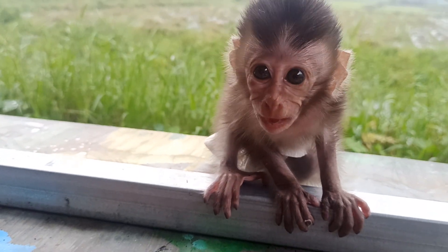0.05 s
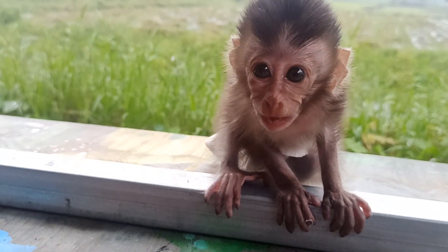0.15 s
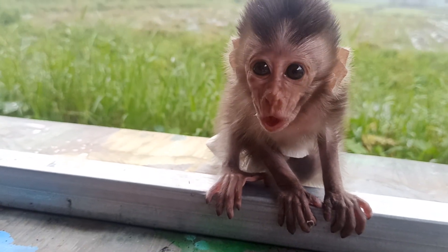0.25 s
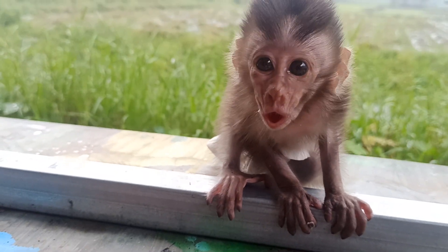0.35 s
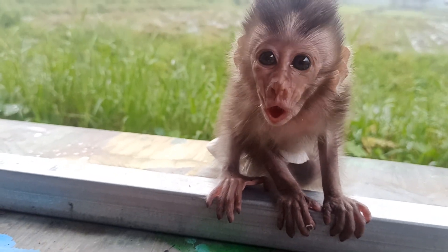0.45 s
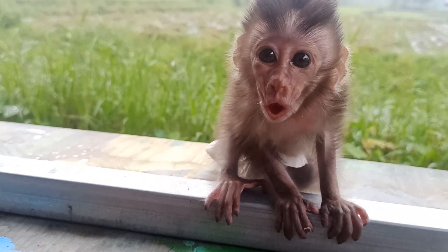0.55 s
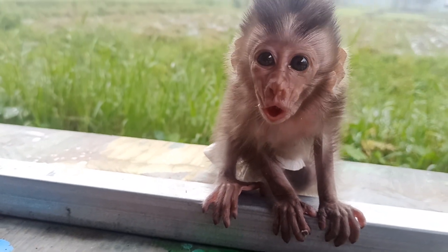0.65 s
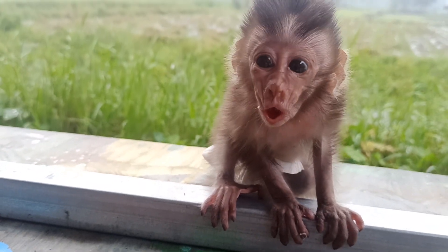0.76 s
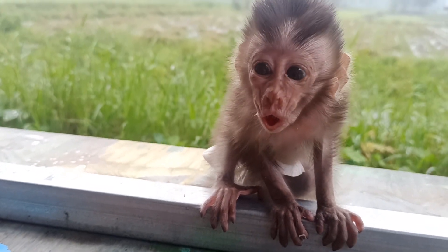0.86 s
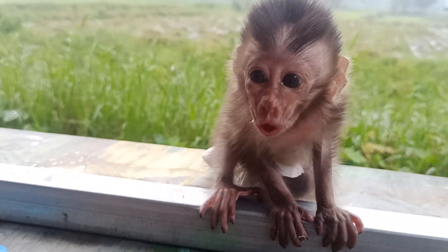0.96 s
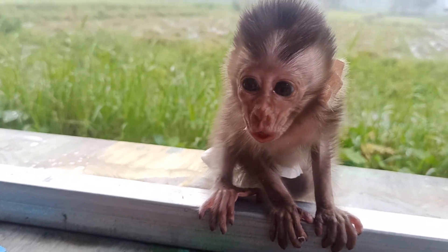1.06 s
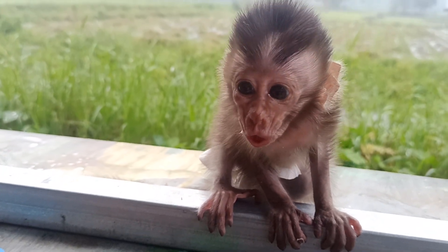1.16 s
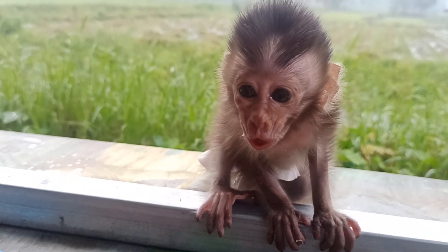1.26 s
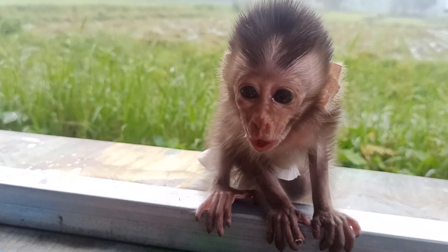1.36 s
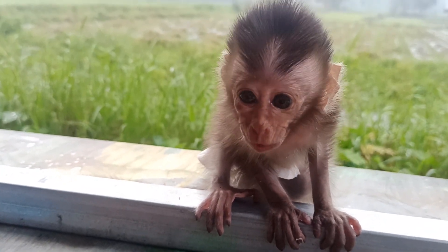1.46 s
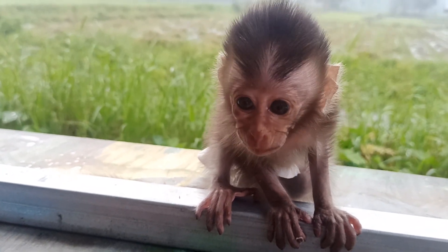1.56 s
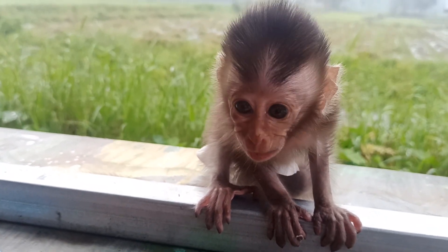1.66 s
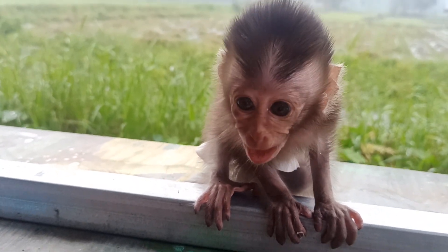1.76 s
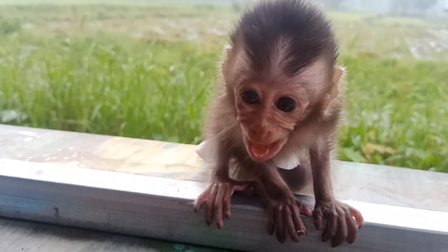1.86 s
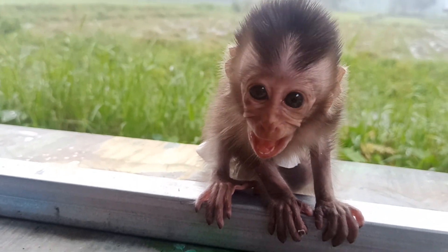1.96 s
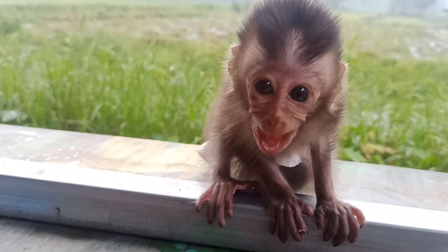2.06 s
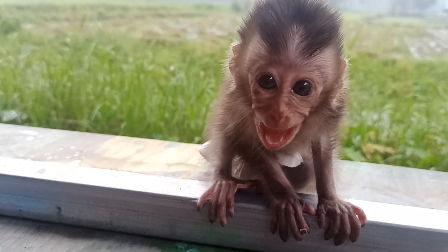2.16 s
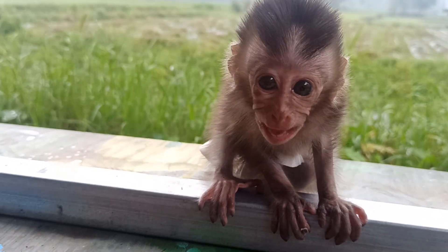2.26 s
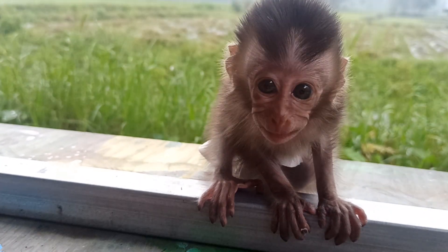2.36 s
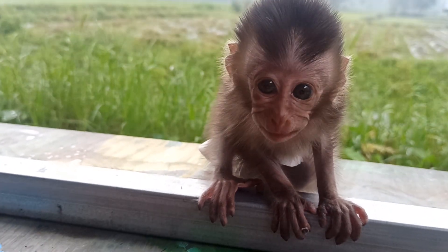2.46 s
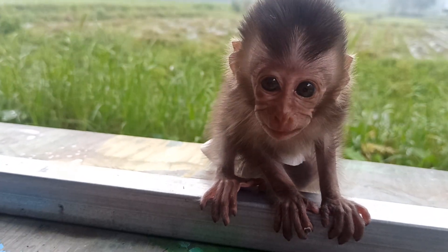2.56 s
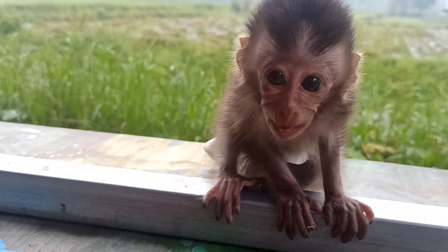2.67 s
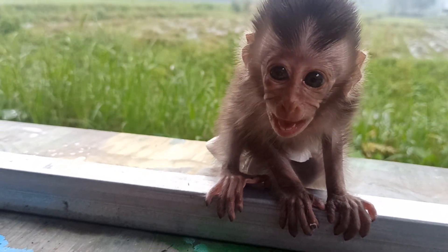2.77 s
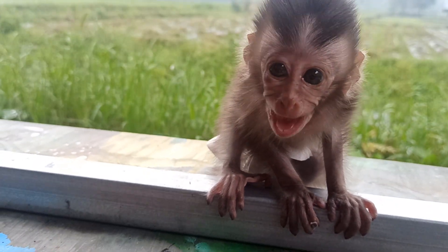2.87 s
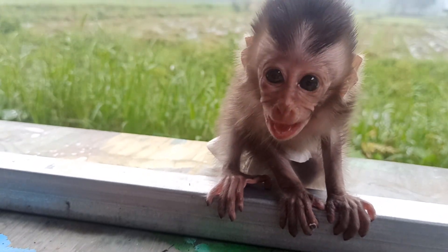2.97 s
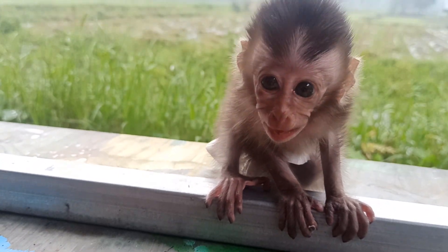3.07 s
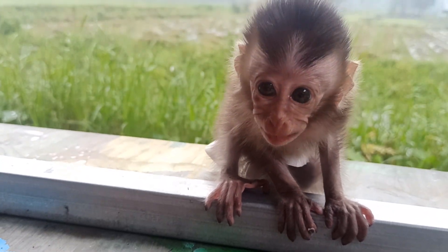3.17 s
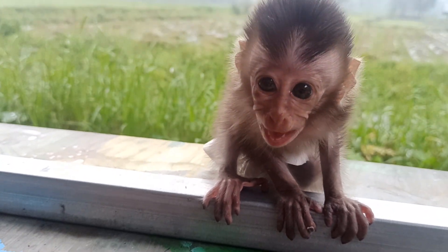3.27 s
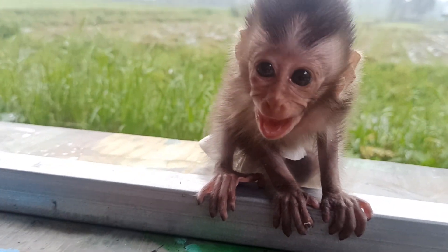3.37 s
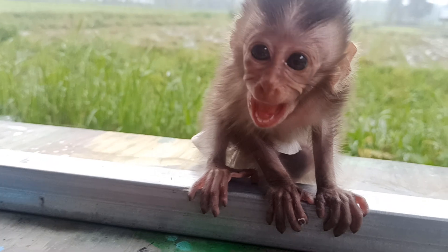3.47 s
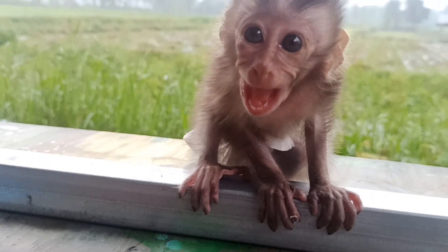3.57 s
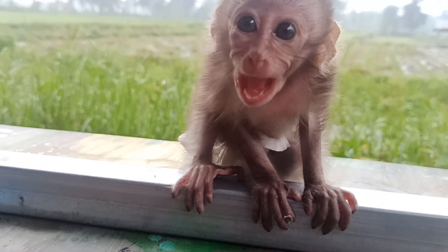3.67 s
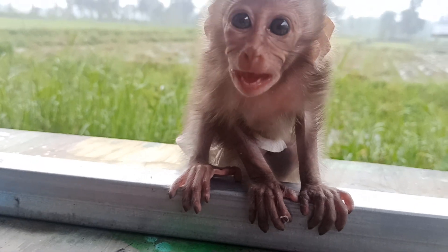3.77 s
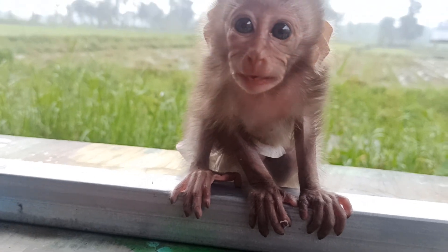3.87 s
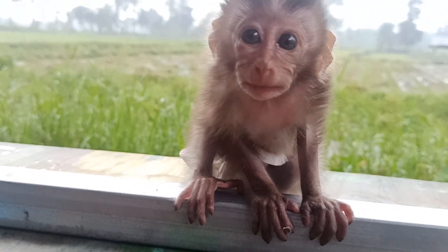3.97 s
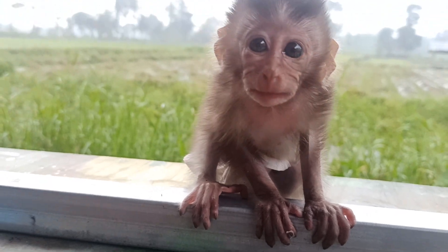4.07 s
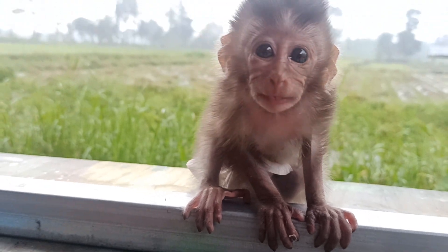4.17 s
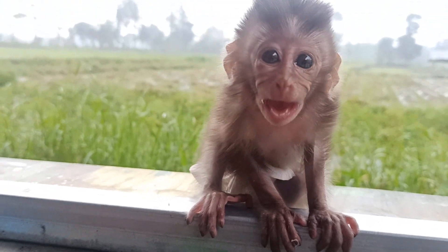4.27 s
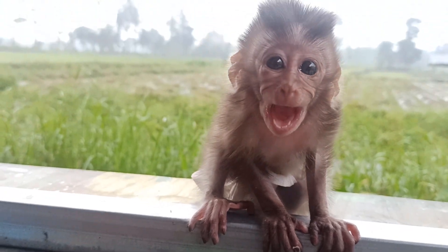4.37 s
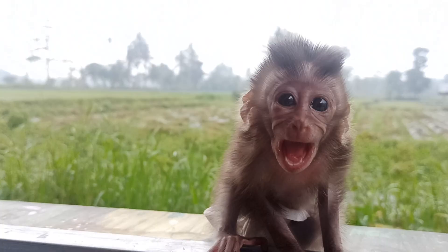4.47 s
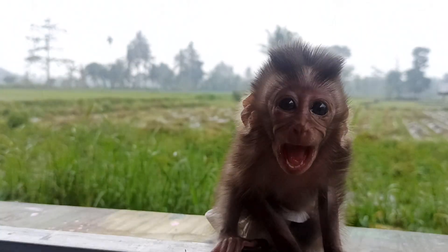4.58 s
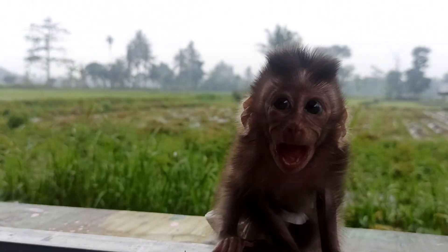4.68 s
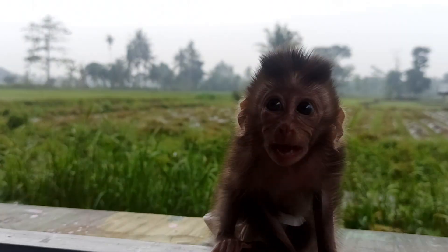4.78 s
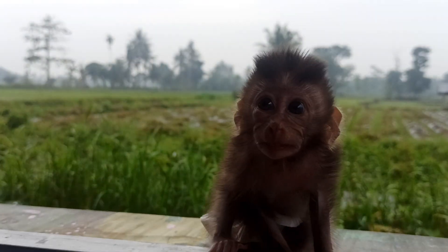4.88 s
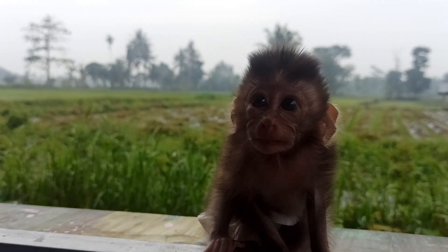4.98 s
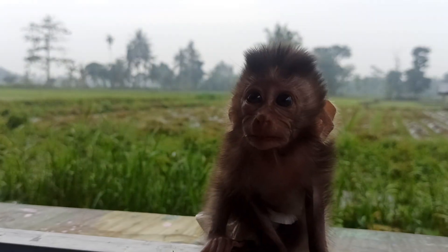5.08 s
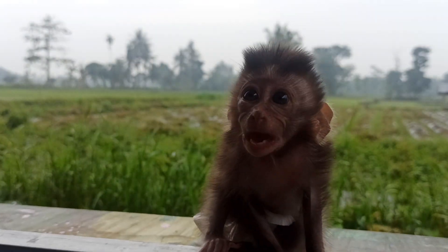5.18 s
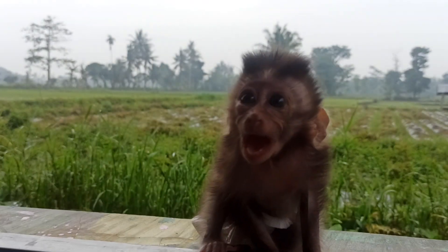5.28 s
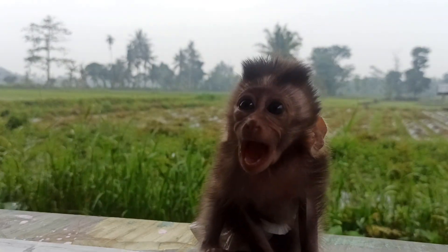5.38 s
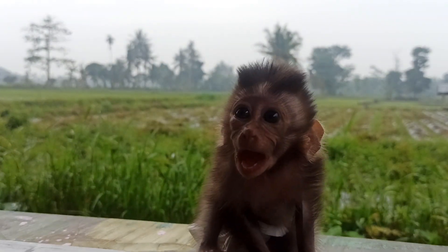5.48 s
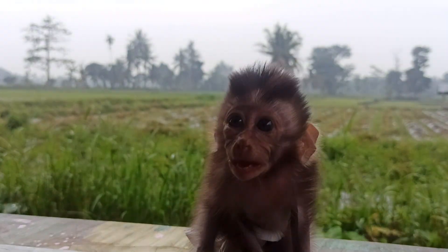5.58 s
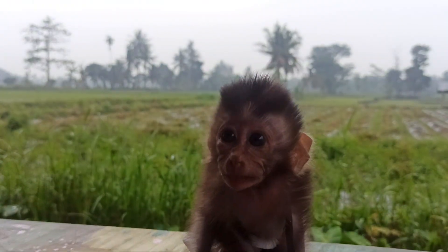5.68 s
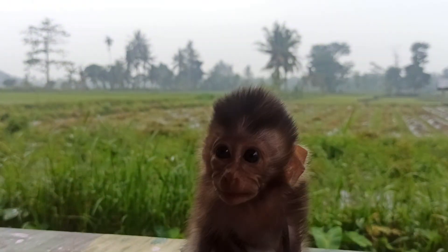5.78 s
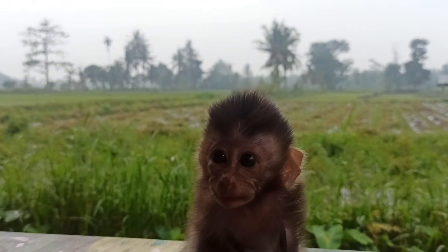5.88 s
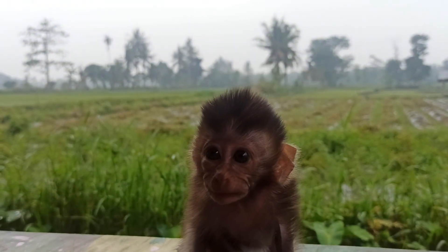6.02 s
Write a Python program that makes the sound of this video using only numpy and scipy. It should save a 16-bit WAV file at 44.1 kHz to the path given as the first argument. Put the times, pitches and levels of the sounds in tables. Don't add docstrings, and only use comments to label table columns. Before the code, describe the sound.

A young monkey very close to a phone microphone gives two soft arched coos and a wavering whimper, then a piercing scream leaping upward and plunging into a torn rasp. A high chirp and three rising squeals follow, with quiet gaps between. Behind lie a faint insect drone, a tiny cricket chirping in threes, low far rumble and dull finger knocks on the case.

```python
import sys
import numpy as np
from scipy import signal
from scipy.fft import rfft, irfft, next_fast_len
from scipy.io import wavfile
from scipy.ndimage import uniform_filter1d, minimum_filter1d, map_coordinates

SR = 44100
rng = np.random.default_rng(int(sys.argv[2]) if len(sys.argv) > 2 else 0)


def to_wav(sig):
    pcm = np.clip(np.atleast_2d(sig), -1, 1) * 32767
    pcm = np.round(pcm).astype(np.int16)
    wavfile.write(sys.argv[1], SR, pcm.T)


def makeup_ratio(level_db):
    decades = np.asarray(level_db, float) / 20
    return 10 ** decades


N = 266805


def unit(x):
    return x / np.sqrt(np.mean(x ** 2) + 1e-20)


def along(points, hz):
    f, v = np.transpose(points)
    return np.interp(np.log(hz + 1), np.log(f + 1), v)


def wobble(rate_hz, size=N):
    knots = rng.standard_normal(int(size * rate_hz / SR) + 4)
    return map_coordinates(knots, [np.arange(size) * rate_hz / SR])


def filtered(x, response):
    m = next_fast_len(N + 8192)
    return irfft(rfft(x, m) * response(np.fft.rfftfreq(m, 1 / SR)), m)[..., :N]


def shares(balance, hz):
    turn = np.arctan(makeup_ratio(-along(balance, hz)))
    return np.sqrt(2) * np.array([np.cos(turn), np.sin(turn)])


# start in
# seconds, length in seconds, level in dB.
PUFFS = [(0, 0.019, -32), (1.387, 0.004, -42.5), (2.897, 0.022, -42), (3.659, 0.015, -42.5),
         (3.6758, 0.002, -27), (3.678, 0.011, -30), (4.667, 0.002, -29), (4.675, 0.013, -32.5),
         (5.42, 0.013, -28), (5.688, 0.0072, -45.5), (2.103, 0.026, -21), (2.11, 0.0017, -20.5),
         (2.1186, 0.001, -13), (2.1436, 0.001, -15), (2.146, 0.014, -27.5), (2.159, 0.07, -36),
         (3.471, 0.029, -36.5), (4.471, 0.02, -39.5), (1.894, 0.052, -42)]


def puffs():
    t, flow = np.arange(N) / SR, np.zeros(N)
    for start_s, length_s, db in PUFFS:
        attack = np.clip((t - start_s) / .002, 0, 1)
        release_s = .004 + 25 * length_s ** 2
        flow += makeup_ratio(db) * attack * np.clip((start_s + length_s - t) / release_s + 1, 0, 1)
    return flow


# frequency in Hz, gain in dB.
OPEN_MOUTH = [(1000, -19), (1500, 17.5), (2000, 21.5), (2600, 24), (3200, 25), (3800, 20.5), (4600, 6),
              (5300, -7), (6200, 0.5), (7200, -2.5), (7900, -11), (8700, -3.5), (10300, -26), (11700, -3),
              (13500, -8), (15500, -15.5)]
# pitch in Hz, tilt in dB per octave.
PURER = [(1000, -0.5), (2000, 14), (2600, 15), (3100, 9.5), (3700, -5), (5000, -16.5), (6500, -4.5)]
# frequency in Hz, gain in dB.
THIN = [(7600, -0.5), (8200, -16.5), (9300, -28), (10400, -22.5), (11200, -47)]


def cry(call, lips, parted, turns, lag):
    tilt, breath_db, rows = call
    k = np.arange(1, 13)[:, None]
    s, hz, db = np.transpose(rows)
    at = np.arange(round(s[0] * SR), round(s[-1] * SR))
    curves = [np.interp(at / SR, s, c) for c in (hz, makeup_ratio(db), db.mean() - db)]
    hz, gain, under_db = [uniform_filter1d(c, size=60) for c in curves]

    tilt = tilt + along(PURER, hz) - .078 * np.clip(under_db, 0, 30)
    breath_db = breath_db + .5 * under_db
    strain = np.clip(hz / 5000, .1, 1)
    gape = np.clip((hz - 1050) / 500, 0, 1)
    hoarse = np.clip(makeup_ratio(breath_db) - .2, 0, 1)

    octaves_per_s = np.abs(np.gradient(uniform_filter1d(np.log2(hz), size=400))) * SR
    glide = np.minimum(octaves_per_s, 25) * parted * np.clip(3 - hz / 1000, 0, 1)
    steady_hz = uniform_filter1d(hz, size=80) * (1 + .003 * wobble(150, len(at)))
    shake = .0004 * glide * wobble(500, len(at)) + .07 * hoarse * wobble(700, len(at))
    hz = steady_hz + shake * np.minimum(steady_hz * 0 + uniform_filter1d(hz, size=1), 2500)

    overtone_hz = k * hz
    mouth_db = (1 - gape) * along(lips, overtone_hz) + gape * along(OPEN_MOUTH, overtone_hz)
    thin_db = (k > 2) * along(THIN, overtone_hz)
    notch_db = (k > 1) * -8 * np.exp(-((overtone_hz - 5600) / 330) ** 2)
    wander_db = 3.5 if parted else 1.5
    uneven_db = wander_db * np.array([wobble(55.6, len(at)) for _ in k])
    weight = makeup_ratio(mouth_db + thin_db + notch_db + uneven_db + tilt * np.log2(k))
    weight = weight * np.clip((15650 - overtone_hz) / 400, 0, 1)

    turns[at] = turns[at[0] - 1] + np.cumsum(hz) / SR
    stack = np.sum(weight * np.sin(2 * np.pi * k * turns[at] + lag), axis=0)
    stack = stack / np.sqrt(np.sum(weight ** 2, axis=0) / 2)
    gain = gain * np.clip(np.minimum(at - at[0], at[-1] - at) / (.002 * SR), 0, 1)
    flutter = np.clip(.13 * strain ** 1.5 + hoarse, 0, 1) * wobble(190, len(at))
    grit = .002 * glide * wobble(2500, len(at))
    torn = np.clip(5 * hoarse, 0, 1)
    leak = gain * makeup_ratio(breath_db)
    return at, gain * (1 + flutter + grit) * stack, leak * (1 - torn), leak * torn


# time in seconds, pitch in Hz, level in dB.
COOS = [
    (-7, -25.5, [(0.255, 860, -32), (0.3, 923, -24.5), (0.335, 1004, -20), (0.385, 1013, -15.5), (0.45, 1027, -13.5), (0.49, 1022, -15), (0.515, 973, -19), (0.53, 952, -29), (0.545, 870, -37)]),
    (-8, -27, [(0.708, 722, -37), (0.73, 778, -27.5), (0.745, 879, -24.5), (0.76, 902, -22), (0.79, 899, -20), (0.808, 942, -21), (0.865, 936, -20), (0.882, 947, -27.5), (0.896, 830, -34.5)]),
]
WHIMPERS = [
    (-9, -17.5, [(1.15, 649.6, -33.5), (1.175, 613.5, -33.5), (1.205, 645, -34.5), (1.22, 797, -31.5), (1.25, 804, -32), (1.285, 750, -34.5), (1.296, 848, -26.5)]),
    (-7.5, -19, [(1.294, 825, -35.5), (1.308, 928, -24), (1.318, 969, -27.5), (1.332, 979, -20.5), (1.342, 1064, -26.5), (1.348, 1144, -29), (1.358, 1232, -21), (1.368, 1306, -26), (1.38, 1310, -49.5)]),
    (-12.5, -15.5, [(1.652, 860, -40.5), (1.655, 783, -33), (1.661, 987, -32), (1.671, 977, -28.5), (1.682, 905, -32.5), (1.69, 1022, -36.5), (1.697, 1060, -50.5)]),
]
OOHS = [
    (0, -12.5, [(2.626, 600, -25.5), (2.632, 605, -34), (2.639, 671, -38), (2.646, 741, -37.5)]),
    (0, -14, [(5.134, 616, -33.5), (5.141, 635, -28), (5.15, 676, -30.5), (5.158, 633, -31.5), (5.166, 725, -35), (5.176, 752, -42.5)]),
]
MURMURS = [
    (-11, -11.5, [(2.603, 668, -35.5), (2.612, 660, -35), (2.628, 610, -36)]),
    (-9, -14, [(5.108, 660, -32.5), (5.118, 665, -38), (5.13, 690, -36.5), (5.137, 647, -37.5)]),
    (-2.5, -16.5, [(2.703, 589.3, -38.5), (2.72, 633, -29), (2.735, 951, -26.5), (2.75, 1375, -20), (2.762, 1166, -27.5), (2.78, 1547, -30)]),
    (-6, -7.5, [(3.216, 794, -52.5), (3.23, 898, -31), (3.246, 900, -39.5)]),
    (-4, -16, [(4.178, 898, -34.5), (4.187, 746, -45), (4.195, 800, -49), (4.203, 669, -33), (4.212, 720, -36), (4.22, 829, -41.5), (4.229, 760, -40.5), (4.24, 870, -36), (4.25, 760, -36)]),
    (1, -20, [(5.174, 776, -30), (5.182, 696, -38), (5.192, 627, -29), (5.202, 686, -27)]),
]
CLIMBS = [
    (-3.5, -29.5, [(2.808, 2306, -40), (2.815, 2500, -11.5), (2.835, 2690, -6.5), (2.85, 2906, -37), (2.866, 3040, -30)]),
    (-1.5, -25, [(3.246, 1038, -36), (3.272, 1466, -23), (3.285, 1930, -14.5), (3.3, 2342, -17), (3.312, 2444, -15.5), (3.326, 2652, -9), (3.335, 2863, -11.5)]),
    (-3.5, -30.5, [(3.333, 2830, -19.5), (3.338, 3110, -7.5), (3.342, 3170, 2), (3.35, 3204, -7.5), (3.362, 3390, -31.5), (3.372, 3540, -48)]),
    (0.5, -18.5, [(4.248, 804, -32), (4.258, 939, -22.5), (4.27, 1140, -21), (4.278, 1418, -12.5), (4.282, 1592, -18), (4.291, 1908, -4.5), (4.308, 2190, -12), (4.32, 2425, -15), (4.326, 2640, -20.5)]),
    (2.5, -29, [(4.324, 2627, -5), (4.33, 2808, -18.5), (4.334, 3050, -3.5), (4.342, 3258, 1.5), (4.349, 3277, -2), (4.353, 3360, -25), (4.358, 3430, -13), (4.364, 3620, -28.5)]),
    (1, -20.5, [(5.201, 704, -26), (5.214, 1230, -25.5), (5.226, 1598, -9), (5.237, 1556, -14), (5.245, 1200, -17.5), (5.258, 1834, -12), (5.261, 1960, -8.5), (5.264, 2268, -10.5)]),
    (0.5, -25.5, [(5.263, 2370, -20), (5.27, 2570, -11.5), (5.28, 2683, -10), (5.288, 2800, -8.5), (5.3, 3050, -23)]),
    (-22, -26.5, [(5.298, 2973, -19.5), (5.312, 3120, -17), (5.319, 3264, -11.5), (5.322, 3536, -9.5), (5.326, 3530, -7.5), (5.338, 3723, -32.5), (5.344, 3780, -38.5)]),
    (-30, -5, [(5.346, 3700, -45), (5.357, 3900, -29), (5.37, 3670, -33.5), (5.383, 3665, -36), (5.392, 3560, -37.5)]),
]
SCREAM = [
    (1.5, -35, [(1.738, 2255, -46.5), (1.749, 2310, -35), (1.753, 2650, -8.5), (1.77, 2682, -10), (1.786, 2718, -11.5), (1.79, 3105, -8)]),
    (2, -30, [(1.788, 2946, -17.5), (1.796, 3247, -6), (1.803, 3370, -11), (1.807, 3476, -31), (1.812, 3500, -7), (1.822, 3840, -19)]),
    (-5.5, -22.5, [(1.818, 3700, -23.5), (1.825, 3930, -16), (1.83, 4520, -10.5), (1.836, 4880, -19), (1.845, 5440, -9), (1.852, 6300, -8.5), (1.866, 7250, -2.5), (1.872, 8210, -25), (1.88, 8440, -10)]),
    (-6, -12.5, [(1.878, 8200, -25), (1.889, 8770, -41.5), (1.903, 9280, -36), (1.921, 9170, -32), (1.935, 10030, -36.5), (1.95, 10240, -37), (1.964, 10600, -39), (1.974, 10200, -56.5)]),
    (-6, -13.5, [(1.988, 10600, -45.5), (2, 10520, -28.5), (2.013, 10490, -27), (2.017, 10380, -67.5), (2.022, 10170, -31), (2.032, 9440, -33), (2.044, 9460, -25), (2.055, 8990, -27.5)]),
    (-36, -23, [(2.048, 4140, -54), (2.066, 4380, -43), (2.076, 4050, -49)]),
]
PLUNGE = [
    (-1, -27, [(2.053, 9080, -24), (2.06, 8750, -23), (2.067, 8420, -9), (2.074, 8000, -21), (2.082, 7500, -6.5), (2.088, 7090, -14), (2.093, 6850, -11.5), (2.099, 5530, -20.5), (2.106, 4120, -2.5)]),
    (-29, -4, [(2.11, 4184, -12.5), (2.114, 4030, -27), (2.118, 3996, -15), (2.121, 3994, -22.5), (2.125, 3990, -19.5), (2.133, 3595, -22.5), (2.14, 3643, -23)]),
    (-30, -6, [(2.145, 4610, -23.5), (2.148, 4150, -21), (2.156, 3580, -22.5), (2.162, 3520, -39)]),
    (-6.5, -13, [(2.104, 4416, -3), (2.112, 3470, -14), (2.117, 3360, -31), (2.125, 2860, -25.5), (2.135, 2610, -23.5), (2.144, 2316, -29.5), (2.15, 2000, -45.5)]),
    (-8, -13, [(2.152, 1490, -43), (2.162, 1030, -42), (2.17, 850, -39)]),
]
SQUEALS = [
    (-10.5, -21, [(3.402, 5630, -30.5), (3.407, 5290, -15), (3.422, 6245, -7.5), (3.435, 7350, -2.5), (3.445, 7950, -22.5), (3.458, 8360, -21), (3.468, 8650, -35), (3.49, 9000, -34), (3.512, 10300, -43)]),
    (-5, -31.5, [(4.402, 5274, -14), (4.412, 5494, -20), (4.425, 6180, -10.5), (4.43, 6300, -14), (4.435, 6750, -6), (4.446, 7210, -12.5), (4.467, 7660, -9), (4.485, 7610, -13)]),
    (-10, -20, [(4.483, 7690, -17.5), (4.5, 7900, -18.5), (4.512, 8080, -26.5), (4.52, 8390, -16.5), (4.54, 8370, -22), (4.547, 8160, -26.5)]),
    (-19, -8, [(5.398, 3034, -38.5), (5.406, 2590, -30.5), (5.41, 2340, -23), (5.413, 1820, -33), (5.417, 1594, -31.5), (5.421, 1400, -41.5)]),
]
YELP = (-30, -13, [(5.407, 4900, -24), (5.411, 4600, -10), (5.413, 4100, -24), (5.415, 3550, -11),
        (5.418, 3050, -20), (5.421, 2800, -32)])
# frequency in Hz, gain in dB.
ROUNDED = [(700, -15), (1000, -14), (1500, -14.5), (2000, 3.5), (2550, -31), (3100, -0.5), (4100, 15.5),
           (5000, -23), (6500, -21), (8300, -3.5), (9500, -11)]
PURSED = [(650, -12), (1300, -10), (1950, 6.5), (2500, -9), (3200, -18.5), (4300, -12), (5200, -32),
          (9000, -44.5)]
PARTED = [(650, 1), (1300, 3), (2000, 7), (2600, 7), (3200, 12.5), (3800, 10), (4500, -4), (5200, -6.5),
          (7000, 1.5), (9000, -26)]
# frequency in Hz, density in dB per Hz.
BREATH = [(1000, -34), (2300, -16), (3000, -11), (3500, 1.5), (4000, 7.5), (4600, -2), (5200, -22),
          (6300, -13), (7500, -13.5), (8600, -28.5), (9200, -40), (10600, -49.5), (11200, -44.5),
          (11700, -27.5), (13000, -21), (15500, -23.5)]
RASP = [(1000, -26.5), (2500, -14), (3600, 1.5), (4600, -4.5), (5400, -17), (7000, -7.5), (8500, -14),
        (10200, -32), (11100, -48.5), (11800, -19.5), (15500, -24)]


def monkey():
    voice, flow, turns = np.zeros(N), np.zeros(N), np.zeros(N)
    gasp = puffs()
    lag = rng.uniform(0, 2 * np.pi, (12, 1))
    calls = [(c, ROUNDED, False) for c in COOS + WHIMPERS]
    calls += [(c, PURSED, False) for c in OOHS]
    calls += [(c, PARTED, True) for c in MURMURS + CLIMBS + SCREAM + PLUNGE + SQUEALS + [YELP]]
    for call, lips, parted in calls:
        at, tone, throat, torn = cry(call, lips, parted, turns, lag)
        voice[at] += tone
        flow[at] += throat
        gasp[at] += torn
    hiss = unit(filtered(rng.standard_normal(N), lambda hz: makeup_ratio(along(BREATH, hz))))
    rasp = unit(filtered(rng.standard_normal(N), lambda hz: makeup_ratio(along(RASP, hz))))
    return voice + (flow * rasp + gasp * hiss) * makeup_ratio(2.0 * wobble(250))


# frequency in Hz, left over right in dB.
NEAR_BALANCE = [(300, -1.5), (1000, -1.5), (2000, -5.5), (2700, -13.5), (3300, -7), (3700, -20.5),
                (4100, -15.5), (4600, -4.5), (5100, -2.5), (5800, 1), (6600, 5), (7400, 0), (7900, 16),
                (8500, 20.5), (9500, 17), (12500, -5)]
# frequency in Hz, left lead in radians.
LEAD = [(0, 0), (2150, 1), (3620, 2.5), (4740, 5), (5340, 4.5), (7240, 5.5), (8960, 13), (10500, 9.5),
        (11000, -0.5), (11400, 20.5), (12800, 13.5), (13800, 11), (14700, 26.5), (15200, 17)]
# delay in seconds, left level in dB, right level in dB.
BOUNCES = [(.0031, -11.5, -22.5), (.0074, -16, -21), (0.01, -25, -34), (0.018, -24, -29.5)]
# delay in seconds, level in dB, centre in Hz.
ECHOES = [(.053, -30, 3300), (.105, -40, 3500), (0.064, -29.5, 11000)]
# frequency in Hz, t60 in seconds.
SHELTER = [(500, 0.95), (2500, 0.44), (3300, 0.62), (4000, 0.58), (7500, 0.51), (12000, 0.25),
           (15000, 0.25)]
# frequency in Hz, gain in dB.
WALL = [(800, -2), (2600, -6.5), (3900, -5.5), (5300, -4), (6200, 2.5), (7400, 7), (8500, 4.5),
        (10000, -12), (14000, 7.5)]


def nearby(x):
    def slaps(hz):
        paths = [makeup_ratio([[left], [right]]) * np.exp(-2j * np.pi * hz * s * [[1], [1.13]])
                 for s, left, right in BOUNCES]
        return 1 + sum(paths)

    def faces(hz):
        return sum(makeup_ratio(db) * np.exp(-((hz - centre_hz) / 800) ** 2 - 2j * np.pi * hz * s)
                   for s, db, centre_hz in ECHOES)

    def ports(hz):
        lead_rad = np.interp(hz, *np.transpose(LEAD))
        return shares(NEAR_BALANCE, hz) * np.exp(.5j * lead_rad * [[1], [-1]])

    def wall(hz):
        return shares(NEAR_BALANCE, hz) * makeup_ratio(along(WALL, hz))

    hz, t, z = signal.stft(rng.standard_normal((2, SR // 2)), SR, nperseg=256)
    decay = makeup_ratio(-60 * t / along(SHELTER, hz)[:, None]) * np.clip((t - .01) / .033, 0, 1)
    bump = makeup_ratio(-15.0) * np.exp(-((t - .048) / .01) ** 2)
    tail = signal.istft(z * (decay + bump), SR, nperseg=256)[1]
    wet = signal.fftconvolve(x[None], tail / np.linalg.norm(tail[0]), axes=1)[:, :N]
    stirred = wet * [1 + .45 * wobble(300), 1 + .45 * wobble(300)]
    sharp = filtered(x, lambda hz: ports(hz) * faces(hz)) * (1 + .6 * wobble(200))
    direct = filtered(x, lambda hz: ports(hz) * slaps(hz))
    return direct + sharp + makeup_ratio(-24.5) * filtered(stirred, wall)


# frequency in Hz, left-right correlation.
ALIKE = [(30, .7), (60, .76), (130, .78), (290, .5), (640, .3), (1400, -.1), (3100, -.05), (15000, 0)]
# frequency in Hz, left over right in dB.
FAR_BALANCE = [(60, -3.5), (110, 2.5), (200, -2), (380, 0), (700, -3), (1290, 0.5), (2380, -4),
               (4400, -7.5), (8120, 10), (15000, -1.5)]


def rush(spectrum, patchy_db):
    z = signal.stft(rng.standard_normal((2, N)), nperseg=512)[2]
    patches = uniform_filter1d(rng.standard_normal(z.shape[1:]), size=5, axis=0)
    patches = unit(uniform_filter1d(patches, size=8, axis=1))
    pair = signal.istft(z * makeup_ratio(patchy_db * patches), nperseg=512)[1][:, :N]

    def mid_side(hz):
        turn = np.arccos(np.clip(along(ALIKE, hz), -1, 1)) / 2
        return makeup_ratio(along(spectrum, hz)) * [np.cos(turn), np.sin(turn)]

    mid, side = filtered(pair, mid_side)
    return unit(filtered(np.array([mid + side, mid - side]), lambda hz: shares(FAR_BALANCE, hz)))


# frequency in Hz, density in dB per Hz.
FIELD = [(21, -37), (40, -35), (50, -34.5), (59, -3), (146, -0.5), (173, -3), (200, -9), (280, -12.5),
         (409, -17.5), (767, -19.5), (852, -21), (1780, -31.5), (4480, -20), (5300, -36.5), (6890, -83.5),
         (11700, -120)]
DRONE = [(3120, -28), (5300, -21.5), (5830, -19), (5990, -19), (6270, 0), (6310, -5), (6660, 3.5),
         (7080, -11), (8390, -6), (8740, -22), (9100, -43.5), (11800, -44.5), (20000, -120)]
# time in seconds, field level in dB, drone level in dB.
AIR = [(0, -49, -49), (2.003, -49.5, -47.5), (3.998, -49, -49), (6.05, -48, -48)]


def field():
    s, field_db, drone_db = np.transpose(AIR)
    t = np.arange(N) / SR
    hum_db = np.interp(t, s, field_db + 2.5) + .69 * wobble(6.8)
    hum = makeup_ratio(hum_db) * rush(FIELD, patchy_db=-2.0)
    chorus_db = np.interp(t, s, drone_db + 1.0) + .14 * wobble(26)
    chorus = makeup_ratio(chorus_db) * rush(DRONE, patchy_db=0.0)
    fizz_spectrum = [(11000, -65.0), (12000, 3.0), (13500, -2.0), (15000, 10.5), (15700, -55.0)]
    return hum + chorus + makeup_ratio(-67.5) * rush(fizz_spectrum, patchy_db=3.5)


def cricket():
    first_s, every_s, stroke_gap_s = .181, .2421, .033
    out, t = np.zeros(N + SR), np.arange(700) / SR
    stroke = np.hanning(len(t)) * np.sin(2 * np.pi * (5000 * t - 32000 * t ** 2))
    chirps = np.arange(first_s, N / SR, every_s)
    for s, sizes_db in zip(chirps, rng.normal(0, 1.8, (len(chirps), 3))):
        for n, db in enumerate(sizes_db):
            start = round((s + stroke_gap_s * n) * SR) - len(t) // 2
            out[start:][:len(t)] += makeup_ratio(db) * stroke
    return out[:N] * makeup_ratio([[-57], [-46]])


# time in seconds, level in dB.
TAPS = [(0.704, -35), (3.177, -30), (3.221, -18), (3.247, -23), (3.301, -31.5), (2.06, -43), (2.109, -32.5),
        (4.509, -44), (4.225, -35.5), (4.259, -25), (4.479, -36.5), (4.498, -34)]


def taps():
    blows = np.zeros(N)
    for s, db in TAPS:
        blows[round(s * SR)] = makeup_ratio(db + 35.0)

    def case(hz):
        resonance = 1j * hz * 900 / (550 ** 2 - hz * hz + 1j * hz * 900)
        return resonance / (1 + 1j * hz / 1500) ** 3

    return filtered(blows, case) * makeup_ratio([[-14], [0]])


# time in seconds, pitch in Hz, level in dB.
FAR_BIRD = [
    (5.26, 720, -67),
    (5.32, 760, -60),
    (5.488, 790, -62),
    (5.532, 950, -58),
    (5.58, 1080, -62),
    (5.63, 1120, -72),
]


def far_bird():
    s, hz, db = np.transpose(FAR_BIRD)
    t = np.arange(N) / SR
    pitch_hz = np.interp(t, s, hz) * (1 + .03 * wobble(150))
    level_db = np.interp(t, s, db, left=-120, right=-120) + 4.5 * wobble(110)
    return makeup_ratio(level_db) * np.sin(2 * np.pi * np.cumsum(pitch_hz) / SR)


def scene():
    return nearby(monkey()) + field() + cricket() + taps() + far_bird()


# frequency in Hz, least level in dB.
KEPT = [(4900, -120), (5150, -71.5), (5550, -87), (5800, -120), (8900, -120), (9100, -78), (10700, -72.5),
        (11400, -62), (11700, -100), (15600, -100)]


def drop_weak_bands(x):
    hz, _, z = signal.stft(x, SR, nperseg=1024)
    band = np.sqrt(np.abs(uniform_filter1d(np.abs(z) ** 2, size=13, axis=1)))
    masker = -minimum_filter1d(-band, size=61, axis=1)
    blocks = rng.random((43, z.shape[2] // 4 + 1)) < .2
    starved = np.kron(blocks, np.ones((12, 4)))[:len(hz), :z.shape[2]] * (hz > 11500)[:, None]
    audible = (band > makeup_ratio(along(KEPT, hz))[:, None]) * (band > makeup_ratio(-42) * masker)
    audible = audible * (1 - starved * (band < makeup_ratio(-64)))
    return signal.istft(z * audible, SR, nperseg=1024)[1][:, :N]


def roll_off(x):
    return signal.sosfilt(signal.butter(12, 15680, fs=SR, output="sos"), x)


def record(dry):
    need = np.minimum(1, .95 / (np.abs(dry).max(axis=0) + 1e-9))
    held = dry * uniform_filter1d(minimum_filter1d(need, size=161), size=81)
    kept = drop_weak_bands(held)
    mix = filtered(kept, lambda hz: (hz < 15690) / np.sqrt(1 + (52 / (hz + 1)) ** 2))
    return roll_off(mix)


dry = scene()
out = record(dry)
to_wav(out)
```